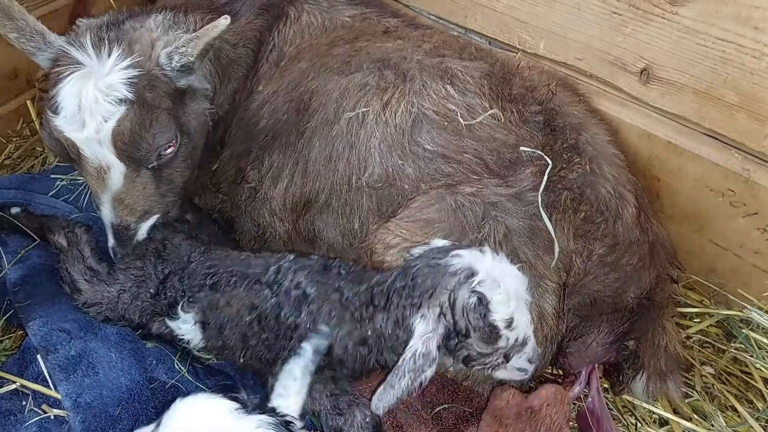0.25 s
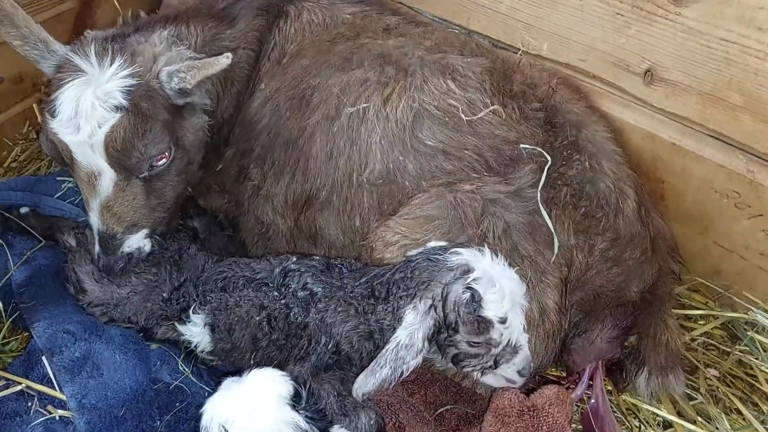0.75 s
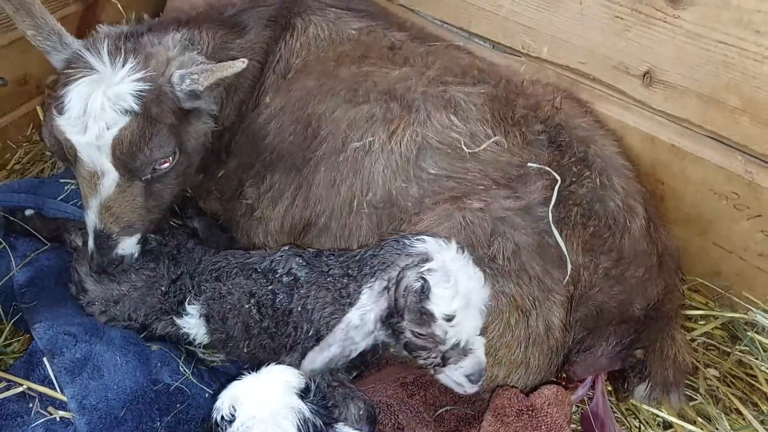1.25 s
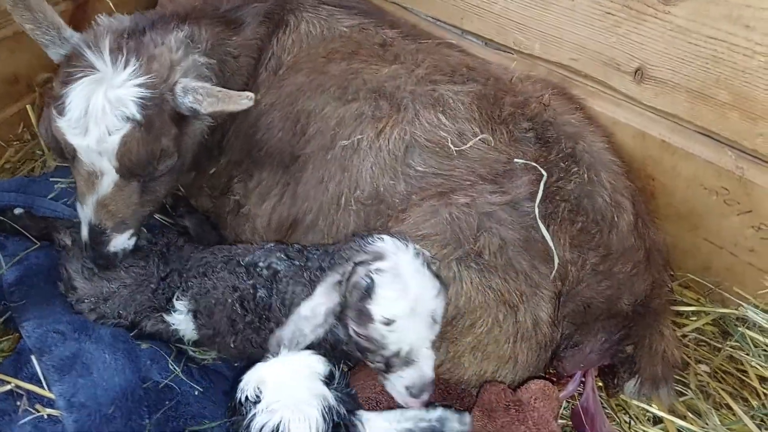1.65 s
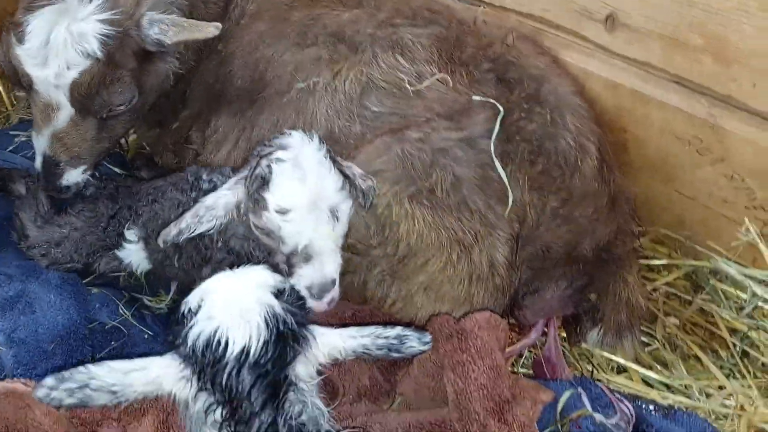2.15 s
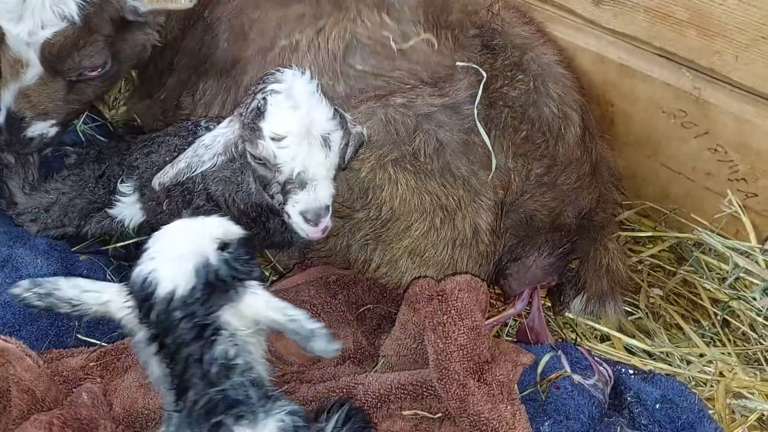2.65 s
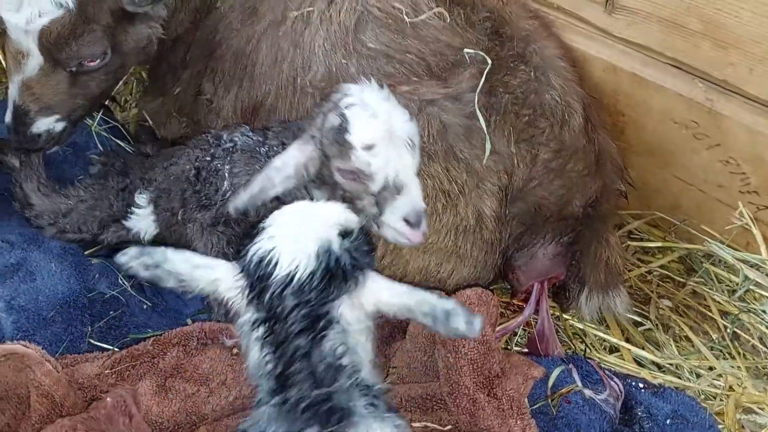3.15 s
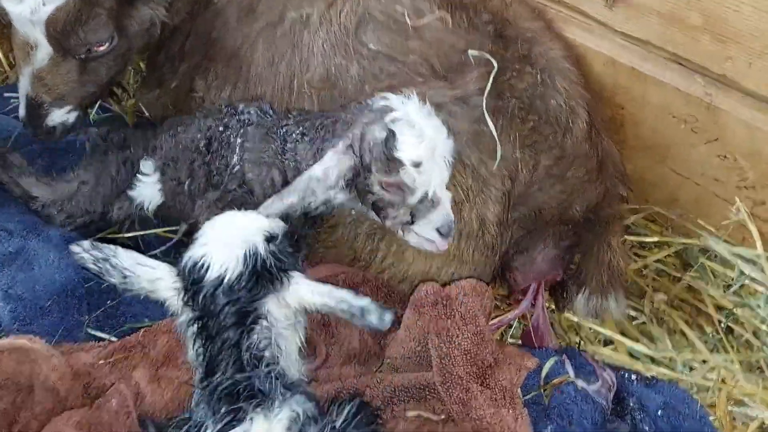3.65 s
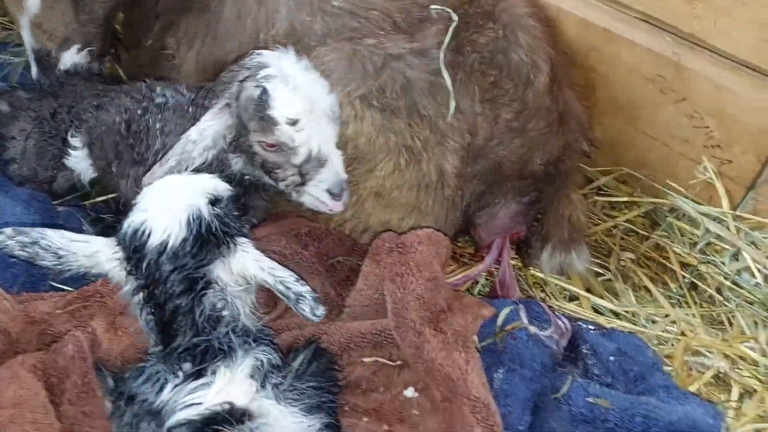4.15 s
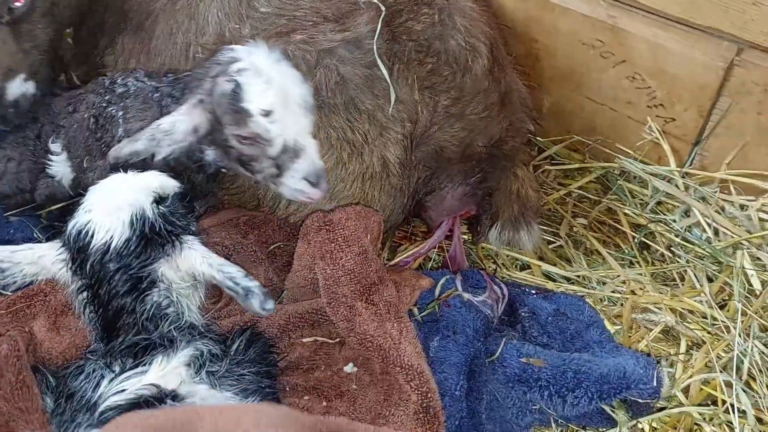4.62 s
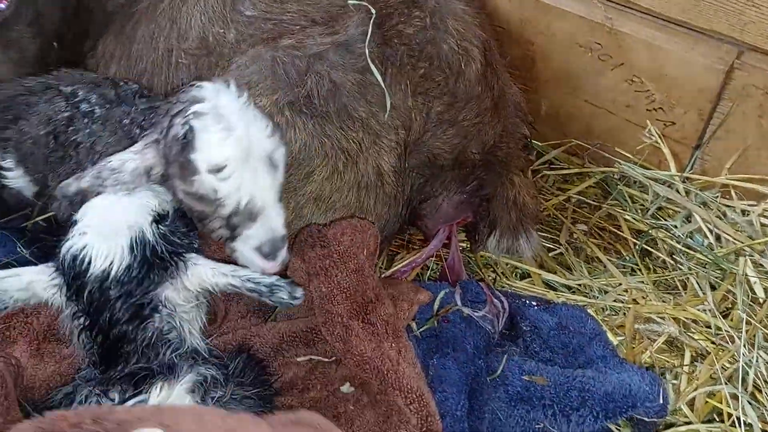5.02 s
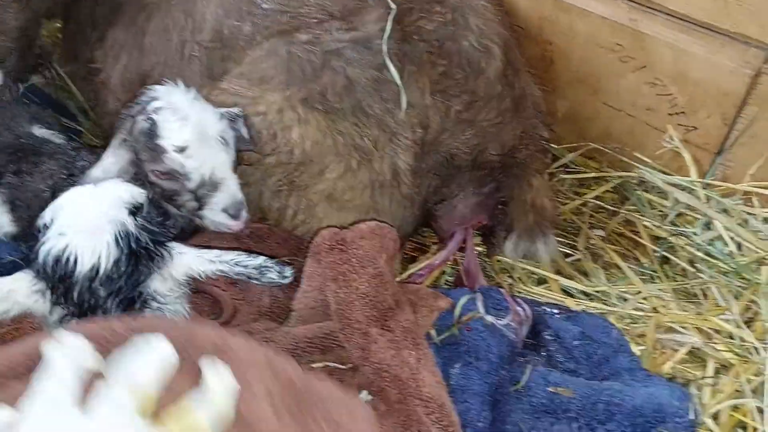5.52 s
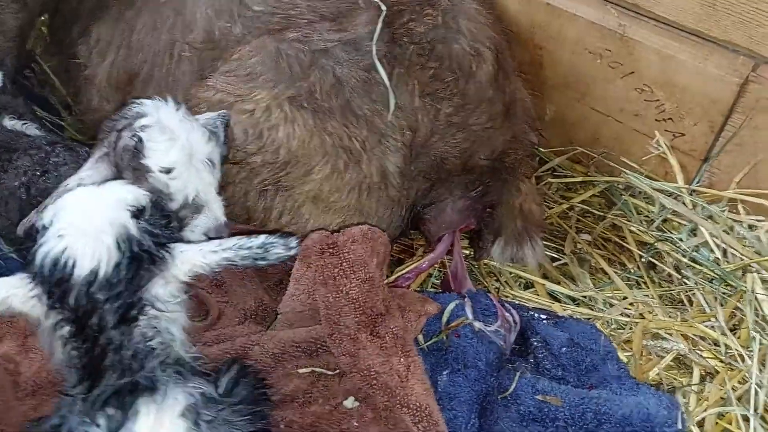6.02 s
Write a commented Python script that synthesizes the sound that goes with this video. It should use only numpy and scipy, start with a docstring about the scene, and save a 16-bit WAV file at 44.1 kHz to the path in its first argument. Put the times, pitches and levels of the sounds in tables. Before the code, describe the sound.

Low fluttering goat grunts, a raspy high bleat and a longer wavering call, with bedding rustling and a towel rubbing a wet coat.

```python
"""A mother goat lies in a straw pen and mutters low, throbbing grunts to her newborn kids: pulses of her vocal
folds ring nose and throat. A second, higher goat voice, built from sine partials and pulsed noise, gives a
hoarse bleat and then a long clear one. Coloured noise in strokes makes the kids' shuffling in the bedding,
with a few soft bumps, snaps and scuffs, and later a towel rubbing over a wet coat."""
import sys
import numpy as np
from scipy import signal
from scipy.fft import rfft, irfft
from scipy.io import wavfile
from scipy.ndimage import uniform_filter1d

SR = 44100
rng = np.random.default_rng(int(sys.argv[2]) if len(sys.argv) > 2 else 0)


def log_audio(samples):
    """Write samples as a 16-bit WAV file to the path given in sys.argv[1]."""
    # one column per channel
    frames = np.atleast_2d(samples).T
    # limit to full scale, then quantise
    limited = np.clip(frames, -1, 1)
    pcm = np.round(limited * 32767).astype(np.int16)
    wavfile.write(sys.argv[1], SR, pcm)


N = 276948
TIME = np.arange(N) / SR  # seconds
BINS = np.fft.rfftfreq(N, 1 / SR)  # Hz


def amp(db):
    """Decibels to gain."""
    return 10 ** (np.asarray(db) / 20)


def unit(x):
    """Scales to rms 1."""
    return x / np.sqrt(np.mean(x ** 2) + 1e-20)


def steady(x, size=700):
    """Holds the short-term rms near 1, over windows of size samples."""
    power = uniform_filter1d(uniform_filter1d(x ** 2, size), size)
    return x / np.sqrt(abs(power) + 1e-12)


def colour(x, points):
    """Filters by a spectrum of (Hz, dB) points, falling 20 dB per octave outside them, to rms 1."""
    hz, db = np.transpose(points)
    octave = np.log2(BINS + 1)
    below = np.maximum(np.log2(hz[0]) - octave, 0)
    above = np.maximum(octave - np.log2(hz[-1]), 0)
    gain_db = np.interp(octave, np.log2(hz), db) - 20 * (below + above)
    return unit(irfft(rfft(x) * amp(gain_db), N))


def wander(hz):
    """Random drift of rms 1, up to a given rate."""
    steps = rng.standard_normal(N // 20)
    return unit(np.interp(TIME * 2 * hz, np.arange(len(steps)), steps))


def resonate(x, hz, width):
    """A steep-sided resonance of gain 1: the same peak filter twice."""
    b, a = signal.iirpeak(hz, hz / (1.5 * width), SR)
    return signal.lfilter(b, a, signal.lfilter(b, a, x))


def glide(x, hz, width):
    """A steep-sided resonance of gain 1 that follows the curve hz, by shifting it to 0 Hz and back."""
    turn = np.exp(2j * np.pi * np.cumsum(hz) / SR)
    r = np.exp(-1.5 * np.pi * width / SR)
    return 2 * (turn * signal.lfilter([(1 - r) ** 2], [1, -2 * r, r * r], x / turn)).real


def swell(s, rise, fall, squareness=2):
    """A smooth bell around time s."""
    out = np.zeros(N)
    near = slice(*np.searchsorted(TIME, [s - 3 * abs(rise), s + 3 * abs(fall)]))
    t = TIME[near] - s
    out[near] = np.exp(-abs(t / np.where(t < 0, rise, fall)) ** squareness)
    return out


def swells(rows):
    """The joint level of (s, half length s, dB) bells, added by power."""
    return np.sqrt(sum((amp(db) * swell(s, half, half)) ** 2 for s, half, db in rows))


def curves(rows):
    """A table's columns at every sample, then a gate that is open while it lasts."""
    s, *columns = np.transpose(rows)
    gate = np.clip(np.minimum(TIME - s[0], s[-1] - TIME) / .025, 0, 1)
    return [np.interp(TIME, s, column) for column in columns] + [gate]


def fibres(grain_db):
    """Countless tiny slips of uneven size, heard differently at each microphone."""
    return rng.standard_normal((2, N)) * amp(grain_db * wander(240))


# Spectrum of the still air. Each row: frequency in Hz, relative level in dB.
AIR_COLOUR = [(35, -6), (60, -3), (190, -18.5), (269, -4.5), (399, -56), (679, -13), (960, -56),
              (7000, -43), (15000, -46)]


def air(level_db=-72):
    """Steady noise, partly shared by the two microphones."""
    shared = rng.standard_normal(N)
    return amp(level_db) * colour(rng.standard_normal((2, N)) + 2 * shared, AIR_COLOUR)


# Strokes of cloth and straw. Each row: strongest moment in seconds, rise in seconds, hiss level in dB,
# crinkle level in dB, both before trims.
RUB_STROKES = [(.2, 0.3, -62.5, -54), (0.314, 0.067, -55, -58.5), (0.701, 0.051, -60, -56),
               (0.939, 0.17, -64.5, -52), (1.45, 0.58, -72, -64), (2.22, 0.43, -63, -60.5),
               (2.549, 0.15, -62.5, -61), (2.92, 0.17, -59, -54.5), (3.111, 0.13, -62, -53.5),
               (3.251, 0.092, -59.5, -52), (3.77, 0.058, -62.5, -75), (3.97, 0.24, -52, -48.5),
               (4.36, 0.45, -61.5, -66), (4.842, 0.19, -58.5, -60), (4.997, 0.12, -56.5, -57.5),
               (5.281, 0.16, -56.5, -57.5), (5.53, 0.11, -59, -61), (5.65, 0.082, -52, -54),
               (5.93, 0.16, -54.5, -55.5), (6.27, 0.16, -54.5, -56.5)]


def strokes(release_share=0.61, squareness=2.3, stir_db=-74.5, uneven_db=2.0):
    """Hiss and crinkle levels of strokes that build slowly and stop sooner, over a constant faint stir."""
    # release_share is of the rise time; a higher squareness starts and stops a stroke more cleanly
    hiss, crinkle = np.zeros((2, N)) + amp(stir_db) ** 2
    for s, rise, hiss_db, crinkle_db in RUB_STROKES:
        speed = swell(s, rise, rise * release_share, squareness)
        hiss += amp(hiss_db) ** 2 * speed ** 1.89
        crinkle += amp(crinkle_db) ** 2 * speed ** 2.38
    return np.sqrt([hiss, crinkle]) * amp(uneven_db * wander(12))


# Resonances of dry stalks, in Hz.
STALK_RINGS = [3340, 3960, 5260]


def stalks(cracks_per_s=82, size_db=3, ring_width_hz=1300):
    """Single stalks crack at random, by uneven amounts, and ring for an instant; each resonance has its own cracks."""
    out = np.zeros((2, N))
    for hz in STALK_RINGS:
        size = amp(size_db * np.minimum(rng.exponential(1, N), 2.5))
        cracks = (rng.random(N) < cracks_per_s / SR) * size
        out += resonate(cracks * (1 + .5 * rng.standard_normal((2, N))), hz, ring_width_hz)
    return unit(out)


# Colours of the rubbing's hiss, its crinkle, the low rumble and the faintly squeaky towel.
# Each row: frequency in Hz, relative level in dB.
HISS_COLOUR = [(2000, -18.5), (4000, -1), (8000, -2), (10000, -3), (13000, 2), (16000, 0)]
CRINKLE_COLOUR = [(100, -2.5), (300, 12.5), (500, 4), (1500, 3), (3000, -4), (4500, -6.5), (6500, -19),
                  (10000, -22)]
RUMBLE_COLOUR = [(36, -3.5), (52, 8), (70, 9.5), (120, 5.5), (200, -5), (350, 2), (600, -12.5),
                 (1500, -11.5)]
TOWEL_COLOUR = [(700, -26), (1700, -2.5), (2200, 2.5), (2700, -2), (3500, -3)]
# Low, soft puffs of rumble, mostly alongside the grunts. Each row: middle in seconds, half length in seconds,
# level in dB.
LOW_PUFFS = [(.965, 0.047, -43.5), (2.1, 0.24, -51.5), (4.07, 0.15, -49), (5.91, 0.061, -49)]


def bedding(hiss_db=2, drag_db=-6, towel_db=-1, stalks_db=-7, hiss_left_db=3.0, crinkle_left_db=2, towel_from_s=3.697):
    """Cloth and straw rub in strokes over a rumble, later a towel; with low puffs, mostly alongside the grunts."""
    hiss, crinkle = strokes()
    left_right = np.array([[.5], [-.5]])
    high = hiss * amp(hiss_db) * colour(fibres(grain_db=1.0), HISS_COLOUR) * amp(hiss_left_db * left_right)
    middle = crinkle * colour(fibres(grain_db=-0.7), CRINKLE_COLOUR) * amp(crinkle_left_db * left_right)
    # the towel takes over from the cracking stalks
    rubbing = np.clip((TIME - towel_from_s) / 0.41, 0, 1)
    towel = crinkle * amp(towel_db) * rubbing * colour(fibres(grain_db=0.5), TOWEL_COLOUR)
    straw = crinkle * amp(stalks_db) * (1 - rubbing) * stalks()
    rumble_level = np.hypot(swells(LOW_PUFFS), amp(drag_db) * crinkle)
    rumble = colour(rng.standard_normal(N) + 0.71 * rng.standard_normal((2, N)), RUMBLE_COLOUR)
    return high + middle + towel + straw + rumble_level * rumble


REST_HZ = 251.2  # the pitch between throbs is at most this
# The mother's throbs. Each row: middle in seconds, half length in seconds, top pitch in Hz, nasal hum level
# in dB, mouth level in dB, roughness from 0 to 1.
GRUNT_THROBS = [(0.015, 0.027, 287.6, -46.5, -52.5, 0.89), (0.066, 0.028, 214.1, -45, -46.5, 0.58),
                (0.134, 0.029, 343.1, -48.5, -40.5, 0.6), (0.179, 0.012, 286.8, -39.5, -47, 0.08),
                (0.212, 0.015, 239.4, -43.5, -46.5, 0.2), (0.249, 0.0099, 367, -43, -40.5, 0.24),
                (0.268, 0.016, 296, -34.5, -43.5, 0.09), (0.341, 0.024, 213.4, -53.5, -47.5, 0.7),
                (0.622, 0.02, 273, -43, -59, 0.78), (0.667, 0.022, 278.4, -36.5, -42.5, 0.52),
                (0.744, 0.019, 297, -34, -39, 0.41), (0.775, 0.013, 315.5, -26.5, -34.5, 0.16),
                (0.833, 0.011, 277, -33.5, -43.5, 0.33), (0.858, 0.015, 295.4, -27, -33, 0),
                (0.952, 0.031, 299.3, -33.5, -37.5, 0.3), (0.995, 0.014, 262.3, -40, -37.5, 0.48),
                (1.021, 0.028, 226, -38, -44, 0.43), (2.723, 0.018, 298.5, -40, -41, 0.62),
                (2.779, 0.031, 391.2, -37, -48, 0.67), (2.85, 0.033, 216.7, -39.5, -44.5, 0.49),
                (2.941, .03, 336.8, -31, -37, 0.52), (3.012, 0.022, 441.3, -29.5, -34, 0.13),
                (3.044, 0.011, 307.1, -34.5, -40.5, 0.04), (3.103, 0.019, 394.4, -24.5, -37, 0),
                (3.133, 0.00797, 303.8, -32.5, -53.5, 0.01), (3.198, 0.03, 439, -30.5, -37.5, 0.11),
                (3.248, 0.013, 303, -35, -44.5, 0.24), (3.282, 0.011, 274, -31.5, -42.5, 0.56),
                (3.668, 0.019, 277.4, -39.5, -59, 0.43), (3.718, 0.031, 344.7, -45, -47.5, 0.67),
                (3.806, 0.014, 248.4, -39, -44.5, 0.41), (3.916, 0.035, 270, -45, -51.5, 0.52),
                (3.983, 0.024, 297.6, -32.5, -44.5, 0.78), (4.07, 0.043, 314.7, -35.5, -50, 0.62),
                (4.142, 0.016, 299, -36, -47.5, 0.5), (5.893, 0.027, 323, -37, -46.5, 0.69),
                (5.987, 0.043, 272.2, -52.5, -57.5, 0.94)]


def throbbing(squareness=1.87, arch=1.25, sag=.09, nose_hz=370, nose_loss_db_per_hz=0.1):
    """Each push lifts the pitch in an arch and opens the mouth; the nasal hum holds through it."""
    s, _, top, _, _, rough = np.transpose(GRUNT_THROBS)
    # between throbs the pitch sinks by the share sag, and at least to the resting pitch
    rest = np.interp(TIME, s, np.minimum(top * (1 - sag), REST_HZ))
    hz, hum, mouth = rest.copy(), np.zeros(N), np.zeros(N)
    for at, half, top_hz, hum_db, mouth_db, _ in GRUNT_THROBS:
        near = slice(*np.searchsorted(TIME, [at - .2, at + .2]))
        u = abs((TIME[near] - at) / half)
        push = np.exp(-arch * u ** 2)
        hz[near] += (top_hz - rest[near]) * push
        # a weaker, wider skirt joins neighbouring throbs
        hum[near] += (amp(hum_db) * (np.exp(-u ** squareness) + 0.26 * np.exp(-(u / 1.3) ** 2))) ** 2
        mouth[near] += (amp(mouth_db) * (push + 0.17 * np.exp(-(u / 2.63) ** 2))) ** 2
    # above nose_hz the nose passes less and less of the hum
    loss_db = nose_loss_db_per_hz * np.maximum(hz - nose_hz, 0)
    return hz, np.sqrt(hum) * amp(-loss_db), np.sqrt(mouth), np.clip(np.interp(TIME, s, rough), 0, 1)


# Resonances of the mother's mouth and throat. Each row: resting frequency in Hz, width in Hz, level in dB.
MOUTH_RESONANCES = [(622, 170, 2), (882, 37, 11), (1135, 124, 11), (1326, 39, 5.5), (3344, 89, -13)]
# Moments in seconds when the folds catch and the grunt's hum drops out.
FOLD_CATCHES = [0.188, 0.285, .69, .755, 0.787, .977, 2.963, 3.063, 3.121]


def grunts(buzz_db=-19, rough_buzz_db=9, weak_share=0.014, jitter=0.0509, mouth_slide=0.057, mouth_drift=0.024,
           catch_s=0.004):
    """Alternately strong and weak pulses of the folds ring nose and throat."""
    hz, hum, mouth, rough = throbbing()
    turns = np.cumsum(hz * (1 + jitter * rough * wander(130))) / SR
    half_turn = np.exp(1j * np.pi * turns)
    # ten equal partials make the even pulses; the same lowered by half the pitch makes them alternate
    stack = half_turn ** 2 * np.polyval(np.ones(10), half_turn ** 2)
    even, alternating = stack.real, (stack / half_turn).real
    folds = unit(even + (weak_share + rough) * alternating)
    puffs = unit((0.1 + np.exp(-(turns / 2 % 1) / 2.7)) * rng.standard_normal(N))
    drive = (1 - rough ** 2) * folds + 2 * rough ** 2 * puffs
    nose = colour(drive, [(70, 0), (150, -6.5), (210, 6.0), (290, 7.5), (430, -3.5),
                          (515, -99), (620, -77), (900, -58)])
    # the mouth opens with the pitch, and its resonances slide
    opening = 1 + mouth_slide * np.clip(hz / REST_HZ - 1.15, -.3, .2) + mouth_drift * wander(11)
    throat = sum(amp(db) * glide(drive + puffs / 2, f * opening, w) for f, w, db in MOUTH_RESONANCES)
    # each strong pulse also forces a spurt of air through the nostrils, most when the voice is rough
    buzz = colour(puffs, [(2000, 21.0), (3400, 13.5), (4300, 14.0), (5500, 27.0),
                          (6700, -38), (8800, 14), (11000, -38)])
    # slack folds beat with uneven strength
    shimmer = amp((1 + 2.5 * rough) * wander(80) - rough)
    catches = 1 - sum(swell(s, catch_s, catch_s) for s in FOLD_CATCHES)
    nasal = catches * hum * steady(nose)
    oral = mouth * (steady(throat) + amp(buzz_db + rough_buzz_db * rough) * buzz)
    return shimmer * (nasal + oral)


# Snaps of straw, scrapes and wet licks. Each row: start in seconds, level in dB before a common trim,
# centre in Hz, decay in seconds.
STRAW_SNAPS = [(0.129, -33.5, 3630, 0.012), (0.176, -35.5, 7200, 0.014), (.81, -41, 3960, 0.008),
               (0.9306, -38, 3670, 0.005), (.965, -36, 3695, 0.0043), (2.6959, -38.5, 10960, 0.012),
               (2.921, -34, 3670, 0.013), (3.2314, -39, 5910, 0.022), (4.96, -34, 3670, 0.0022)]


def snaps(level_db=-9):
    """Short bursts of crackle, each with its own ring."""
    out, t = np.zeros((2, N)), np.arange(5000) / SR
    for s, db, hz, decay in STRAW_SNAPS:
        noise = rng.standard_normal((2, len(t)))
        ring = resonate(noise, hz, 1550)
        burst = unit(ring + 0.031 * noise) * np.exp(-t / decay)
        out[:, round(s * SR):][:, :len(t)] += amp(db + level_db) * burst
    return out


# Brief scuffs of hoof, muzzle and straw. Each row: middle in seconds, half length in seconds, centre in Hz,
# level in dB.
PEN_SCUFFS = [(.465, 0.034, 6400, -69.5), (0.503, 0.0086, 900, -67.5), (.885, 0.025, 5260, -66),
              (0.96, 0.054, 1730, -49.5), (1.059, 0.054, 1090, -50.5), (2.859, 0.041, 7470, -58),
              (3.11, 0.095, 7900, -60.5), (3.971, .025, 2880, -50), (4.61, 0.042, 2006, -63),
              (5.537, 0.014, 1560, -59)]


def scuffs(width_share=0.24):
    """Short, grainy scrapes, each through one resonance as wide as a share of its centre frequency."""
    slips = fibres(grain_db=2.5)
    slips = slips + slips[::-1] / 2  # each microphone hears some of the other's
    out = np.zeros((2, N))
    for s, half, hz, db in PEN_SCUFFS:
        out += amp(db) * swell(s, half, half) * unit(resonate(slips, hz, hz * width_share))
    return out


# Beats of clear tone in the hoarse bleat. Each row: middle in seconds, half length in seconds, pitch in Hz,
# first, second and fourth partial in dB.
CLEAR_BEATS = [(1.239, 0.022, 717, -29.5, -53, -46), (1.344, 0.018, 683.6, -39, -45.5, -70),
               (1.434, 0.0082, 706.4, -30.5, -45, -53.5), (1.456, 0.0094, 753.6, -36.5, -30, -53),
               (1.498, 0.032, 734, -37, -32.5, -63), (1.571, 0.027, 731, -35.5, -42.5, -74),
               (1.621, 0.02, 708, -32, -33.5, -59)]
# Tears into a wide, harsh rasp. Each row: middle in seconds, half length in seconds, level in dB.
VOICE_TEARS = [(1.27, 0.025, -49), (1.395, 0.067, -42), (1.61, .05, -46)]
# Colours of the held rasp and of the tears. Each row: frequency in Hz, relative level in dB.
HOARSE_COLOUR = [(350, -15), (520, -2.5), (650, 20.5), (820, 7.5), (1000, 4), (1300, 15), (1530, 19),
                 (1800, -1), (2070, 14), (2400, -9), (2850, 6.5), (3100, -50.5), (3700, -2.5), (4300, -7),
                 (5800, -13), (6300, -38)]
TEAR_COLOUR = [(550, -11.5), (750, 4.5), (1100, 3.5), (2100, 6), (2700, -8), (5800, -27.5)]


def hoarse_bleat(start_s=1.16, end_s=1.641, between_hz=728, scoop_hz=127.5, scoop_s=0.023, third_db=-23, top_db=-11,
                 fifth_db=-24, linger=0.55, between_db=-46, loose_jitter=0.0199,
                 rasp_db=-36.5, rasp_build_db=6, build_s=0.21, rasp_duck=0.44, rasp_release_s=0.048):
    """A high, quavering tone that locks into clear beats and falls apart into rasp between them."""
    s, half, pitch, *levels = np.transpose(CLEAR_BEATS)
    age = np.maximum(TIME - start_s, 0)
    held = np.minimum(age / 0.037, 1) * np.exp(-np.maximum(TIME - end_s, 0) / rasp_release_s)
    bells = np.array([swell(at, w, w) for at, w in zip(s, half)])
    clear = np.minimum(bells.sum(0), 1)
    # the voice slides up to its pitch from below
    hz = between_hz - scoop_hz * np.exp(-age / scoop_s) + (pitch - between_hz) @ bells
    jitter = loose_jitter * (1 - clear) ** 2 * wander(120)
    turn = 2 * np.pi * np.cumsum(hz * (1 + jitter)) / SR
    first, second, fourth = (swells(zip(s, half, db)) for db in levels)
    # a weak tone hangs on between the beats, and lingers after the last
    weak = amp(between_db) * held ** linger
    partials = [first + weak, second + weak, amp(third_db) * second, fourth,
                amp(fifth_db) * second, 0, amp(top_db) * fourth]
    tone = sum(level * np.sin(k * turn) for k, level in enumerate(partials, 1))
    # the rasp comes in uneven puffs, one to every second cycle
    puffs = rng.standard_normal(N) * (1 + np.cos(turn / 2)) * amp(0.73 * wander(110))
    rasp_level = held * (1 - rasp_duck * clear) * amp(rasp_db - rasp_build_db * np.exp(-age / build_s))
    rasp = rasp_level * colour(puffs, HOARSE_COLOUR)
    torn = swells(VOICE_TEARS) * colour(rng.standard_normal(N) * amp(2.6 * wander(160)), TEAR_COLOUR)
    return np.sqrt(2) * tone + torn + rasp  # the root makes partial levels rms


# The long bleat's course. Each row: time in seconds, pitch in Hz, second, fourth, fifth and seventh partial
# in dB.
LONG_COURSE = [(1.78, 291, -49.5, -39, -64, -68), (1.83, 352.1, -38.5, -49, -52.5, -57),
               (1.893, 355.3, -37.5, -43.5, -44.5, -61), (1.975, 354.5, -38, -45, -46.5, -55.5),
               (2.13, 358.5, -39, -33.5, -52.5, -60.5), (2.165, 352.8, -43.5, -43, -57, -61),
               (2.28, 365, -37, -32, -51, -71), (2.335, 366.3, -42.5, -58, -58, -69),
               (2.42, 362.7, -43.5, -44, -66.5, -73), (2.77, 351.5, -45.5, -39, -51, -75),
               (2.91, 341, -49.5, -31, -55.5, -77), (2.99, 328.7, -44, -45, -57, -88)]
# Moments when it breaks into rasp. Each row: middle in seconds, half length in seconds, level in dB before a trim.
VOICE_BREAKS = [(1.8, 0.02517, -44.5), (2.285, 0.03, -39.5), (2.37, 0.089, -45.5), (2.5, 0.086, -46),
                (2.68, 0.11, -49)]
# Its faint overtones. Each row: multiple of the pitch, level in dB against the call's brightness.
FAINT_OVERTONES = [(6, -23), (10, -25), (14, -19.5), (17, -26)]
# Colour of its rasp. Each row: frequency in Hz, relative level in dB.
LONG_COLOUR = [(400, -10), (580, -7.5), (800, 4), (950, 2), (1250, 9), (1480, 18), (1650, -4), (1850, 2.5),
               (2100, -11), (2800, -20), (3700, -8), (4500, -50)]


def long_bleat(third_db=-53, upper_db=1.0, fade_db_per_s=-3, noise_db=3, clear_db=-68, flutter=0.0022, shake_db=4,
               low_shake_share=0.46, shake_hz=22, flap=0.4, flap_hz=130):
    """An octave lower and clear: strong even partials without a fundamental, shaking most where the voice breaks."""
    hz, second, fourth, fifth, seventh, gate = curves(LONG_COURSE)
    rasp = swells(VOICE_BREAKS) + amp(clear_db)
    broken = rasp / rasp.max()
    shake = shake_db * np.sqrt(broken) + 1.5
    # the voice tires: its high overtones fade as the call goes on
    fade_db = fade_db_per_s * np.clip(TIME - LONG_COURSE[0][0], 0, 2)
    brightness_db = 0.5 * (fifth + second) - 5 + upper_db + fade_db
    turn = 2 * np.pi * np.cumsum(hz * (1 + flutter * wander(65))) / SR
    tone = amp(second + low_shake_share * shake * wander(shake_hz)) * np.sin(2 * turn)
    for k, db in [(4, fourth), (5, fifth), (7, seventh)]:
        tone += amp(db + shake * wander(shake_hz)) * np.sin(k * turn)
    # a weak, steady third partial sounds between the strong even ones
    tone += amp(third_db) * np.sin(3 * turn)
    # where the voice breaks, a second, slower flapping of the folds puts sidebands on the partials
    flap_turn = 2 * np.pi * np.cumsum(flap_hz * (1 + 0.051 * wander(40))) / SR
    tone *= 1 + flap * broken * np.sin(flap_turn)
    for k, db in FAINT_OVERTONES:
        tone += amp(brightness_db + db + 8.0 * wander(15)) * np.sin(k * turn)
    noise = colour(rng.standard_normal(N) * (1 + 1.8 * np.cos(turn)), LONG_COLOUR)
    return gate * (np.sqrt(2) * tone + amp(noise_db) * rasp * noise)


# Soft bumps of a leg on the bedding. Each row: start in seconds, level in dB.
LEG_BUMPS = [(2.02, -36), (2.038, -34), (2.06, -41), (2.085, -36), (2.105, -39), (2.119, -38),
             (3.889, -33.5)]


def bumps(hz=75, decay=0.012, puff=0.42, drop_hz=220, drop_s=0.0018):
    """Each bump is one dull swing of the padded floor, falling quickly in pitch, with a puff of cloth."""
    out = np.zeros(N)
    puffs = colour(rng.standard_normal(N), [(100, 4), (350, 3.5), (1500, -8)])
    for s, db in LEG_BUMPS:
        t = np.maximum(TIME - s, 0)
        turns = hz * t + drop_hz * drop_s * (1 - np.exp(-t / drop_s))
        level = amp(db) * (1 - np.exp(-t / 0.00087)) * np.exp(-t / decay)
        out += level * (np.sin(2 * np.pi * turns) + puff * puffs)
    return out


def chirp(s, length, hz, slide, waver):
    """The arched level and the phase of a short sliding tone."""
    t = np.clip(TIME - s, 0, length)
    pitch = (hz + slide * (t - length / 2)) * (1 + waver * wander(250))
    return np.sin(np.pi * t / length), 2 * np.pi * np.cumsum(pitch) / SR


# Thin, short squeaks. Each row: start in seconds, length in seconds, middle pitch in Hz, glide in Hz per
# second, level in dB.
SQUEAKS = [(2.25, 0.073, 5280, -4800, -42), (2.251, 0.07, 6950, -6400, -50)]


def whistles(waver=0.028):
    """Narrow, wavering tones that swell, slide and fade."""
    out = np.zeros(N)
    for *shape, db in SQUEAKS:
        level, turn = chirp(*shape, waver)
        out += amp(db) * level * np.sin(turn)
    return out


def planks(x, echo_db=-7, t60=0.16):
    """The nearest planks and the floor throw a sound straight back, differently at each microphone."""
    t = np.arange(SR // 30) / SR
    hits = (rng.random((2, len(t))) < .05) * (t > .0006)
    taps = rng.standard_normal((2, len(t))) * hits * amp(-60 * t / t60)
    taps /= np.linalg.norm(taps, axis=1, keepdims=True)
    echo = signal.oaconvolve(x, taps, axes=1)[:, :N]
    return (x + amp(echo_db) * echo) / np.hypot(1, amp(echo_db))


def pen(x, t60):
    """Short reflections from the plank walls, soon soaked up by straw."""
    t = np.arange(SR // 3) / SR
    hits = (rng.random((2, len(t))) < .06) * (t > .003)
    taps = rng.standard_normal((2, len(t))) * hits * amp(-60 * t / t60)
    return signal.fftconvolve(x[None], taps / np.linalg.norm(taps[0]), axes=1)[:, :N]


def place(x, lead, left_db):
    """The sound leads at the left microphone, by a phase in radians at each frequency."""
    late = irfft(rfft(x) * np.exp(-1j * lead), N)
    return np.array([x * amp(left_db / 2), late * amp(-left_db / 2)])


# The bleats come partly by way of the planks, so their lead at the left microphone is uneven.
# Each row: frequency in Hz, phase lead in radians.
PLANK_LEAD = [(0, 0), (720, 1.15), (1080, 2), (1450, 4), (1790, 4.8), (2070, 7.6), (2500, 7.8), (16000, 50)]


def scene():
    """Both voices in the pen, over the bedding and still air."""
    mother = grunts()
    bleats = hoarse_bleat() + long_bleat()
    near_lead = 2 * np.pi * BINS * .00029  # 0.29 ms
    wall_lead = np.interp(BINS, *np.transpose(PLANK_LEAD))
    voices = place(mother, near_lead, left_db=-.5) + place(bleats + whistles(), wall_lead, left_db=-2.5)
    room = amp(-15) * pen(mother + 2 * bleats, t60=.16)
    thuds = place(bumps(), near_lead, left_db=-8)
    return voices + room + planks(bedding() + scuffs()) + snaps() + thuds + air()


# The two microphone openings colour the sound differently. Each row: frequency in Hz, left minus right in dB.
MIC_OPENINGS = [(560, 1), (700, 3.5), (880, 0.5), (2200, -1), (2800, 3), (3600, -2), (5500, 1.5),
                (9000, 3.5), (12500, -1)]


def record(dry, edge_hz=15900):
    """The colour of the two microphone openings, then the recorder's band limit."""
    hz, left_db = np.transpose(MIC_OPENINGS)
    tilt = np.interp(np.log(BINS + 1), np.log(hz), left_db)
    heard = irfft(rfft(dry) * amp([tilt / 2, -tilt / 2]), N)
    low_pass = signal.firwin(511, edge_hz, window=("kaiser", 9), fs=SR)
    return signal.oaconvolve(heard, low_pass[None], "same")


dry = scene()
out = record(dry)
log_audio(out)
```